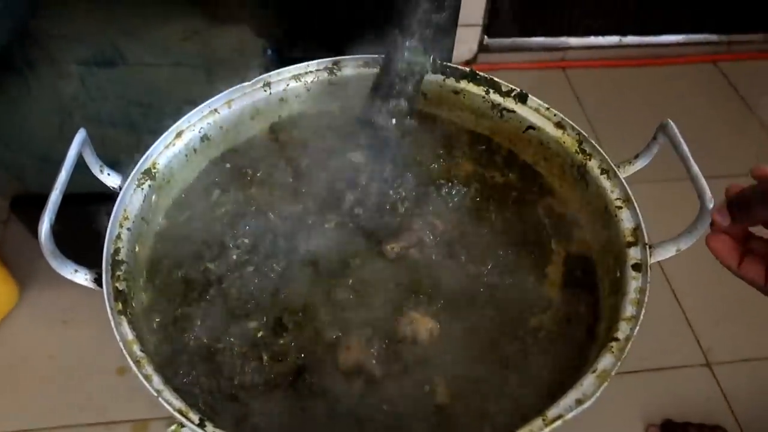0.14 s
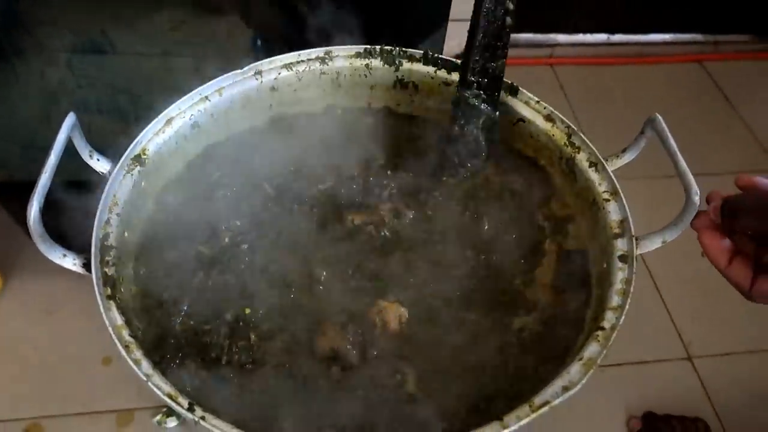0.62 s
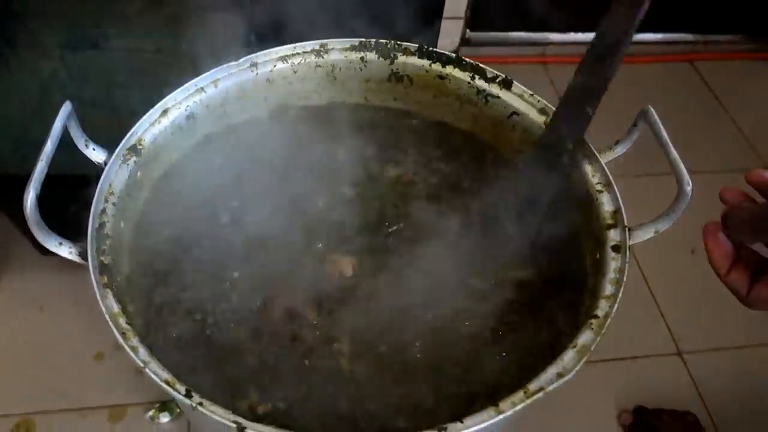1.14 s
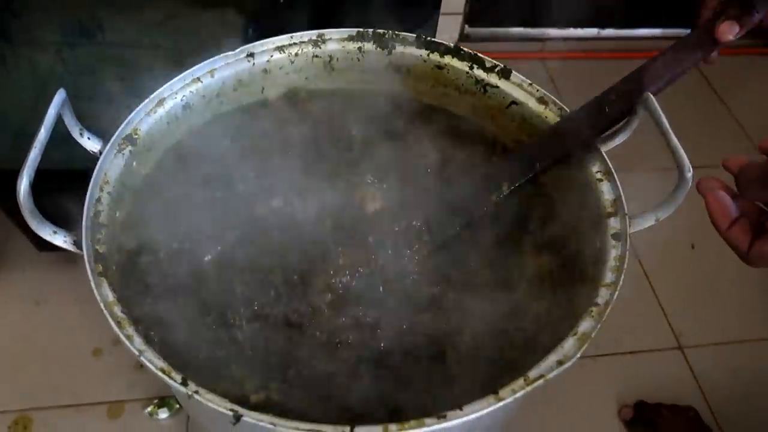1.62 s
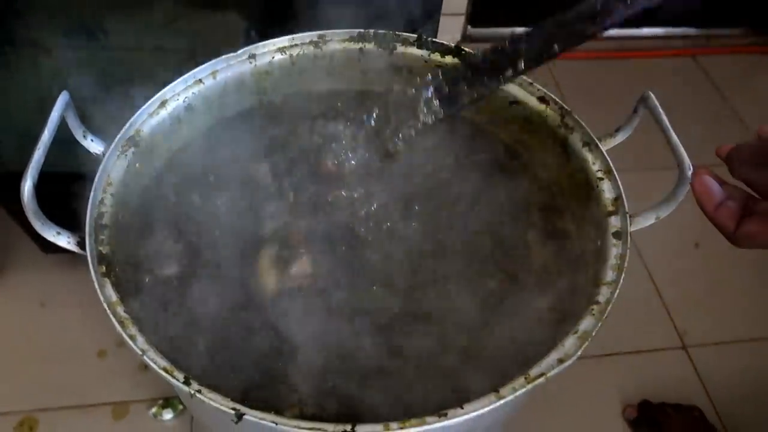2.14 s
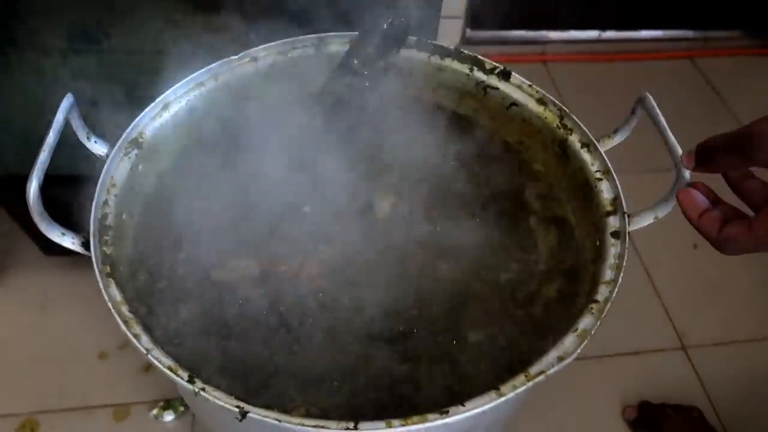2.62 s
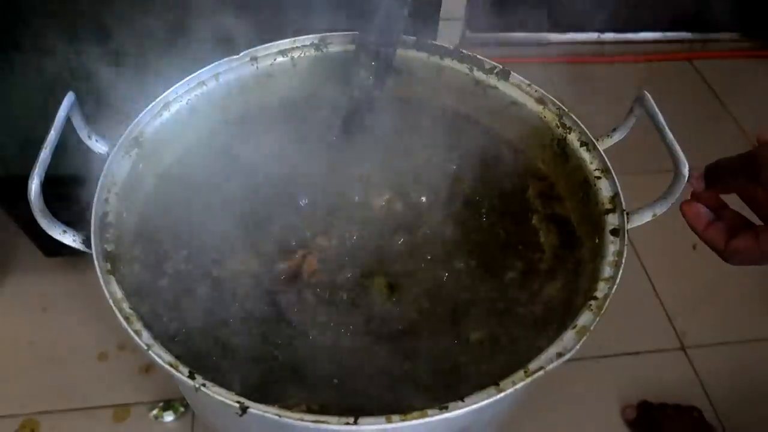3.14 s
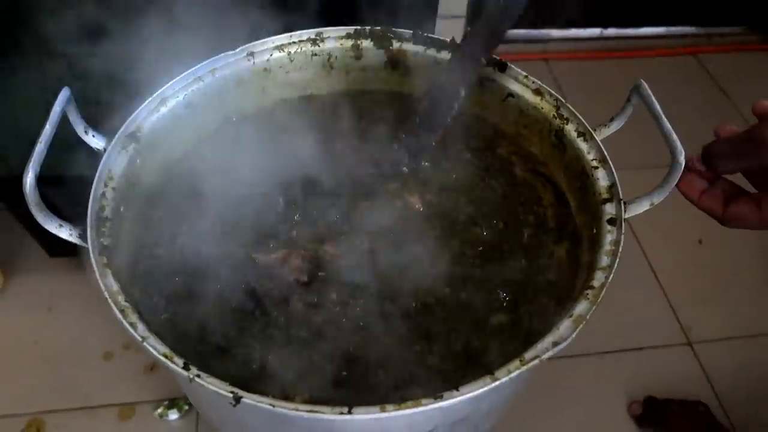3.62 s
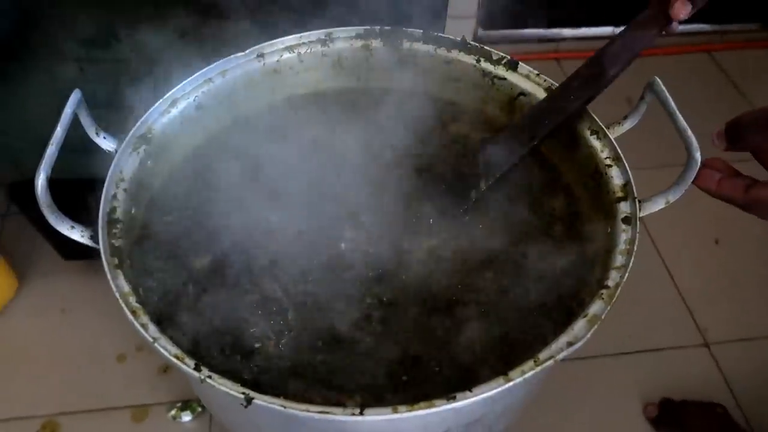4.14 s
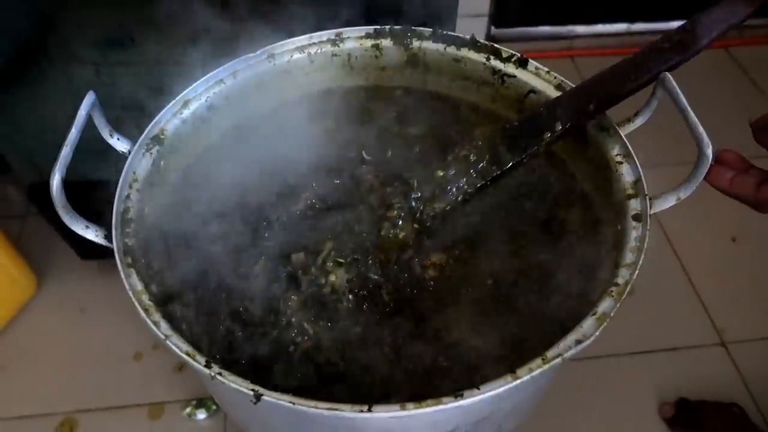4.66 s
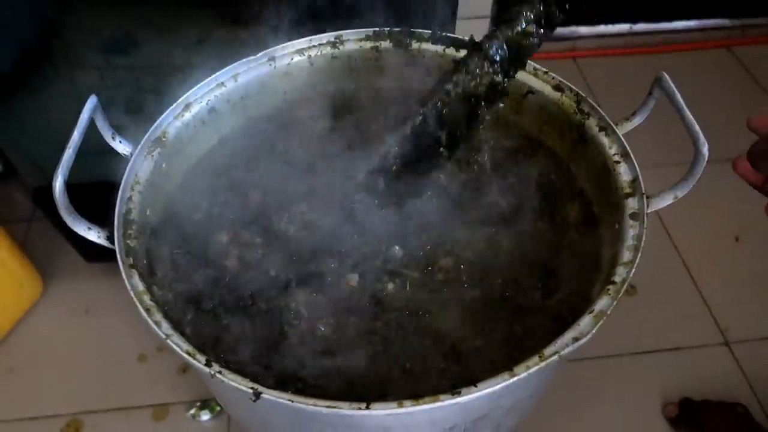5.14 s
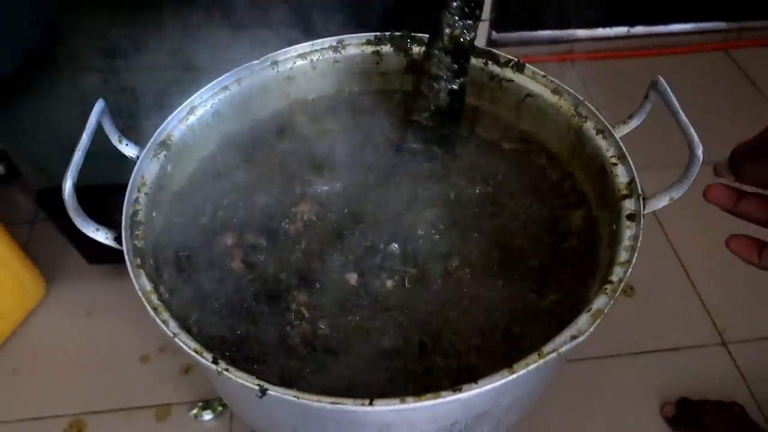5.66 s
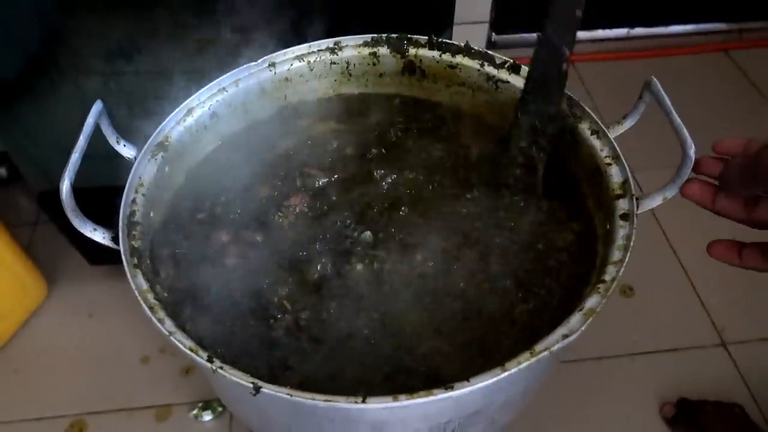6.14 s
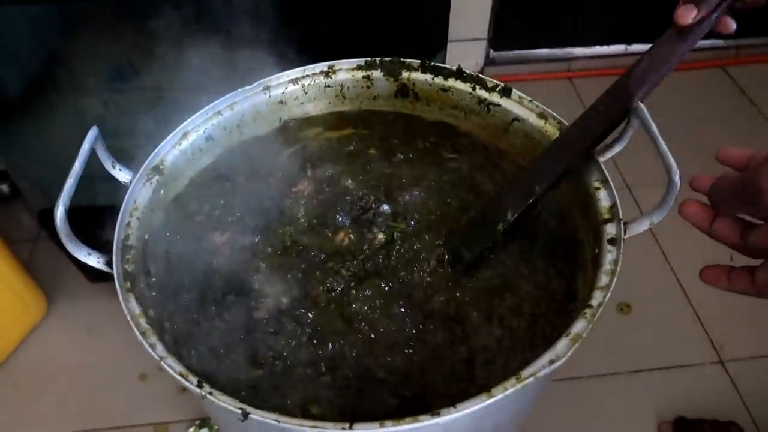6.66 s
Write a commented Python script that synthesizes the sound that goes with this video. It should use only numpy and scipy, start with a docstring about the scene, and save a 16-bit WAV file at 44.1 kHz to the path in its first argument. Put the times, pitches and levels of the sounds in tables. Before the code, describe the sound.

A big metal pot of thick soup keeps up a dense, soft simmer of countless small bubbles. Irregular wet pops and tiny high spits break out, clustering between three and four seconds, then sharply around five and six. Slow stirring makes the simmer swell and sink, with faint low paddle thuds. Close stereo microphone, short reflections from a tiled kitchen.

```python
"""Short pops and fine spits break out of a dense simmer: thick soup in a large metal pot.
Each pop is a steam cavity that rings for a few cycles, with close echoes and the tail of a hard room.
The simmer is many small bubbles and their reverberant wash, split into layers that swell as a paddle
stirs; narrow resonances of the pot wall colour it, and the paddle bumps the bottom with soft thuds."""
import sys
import numpy as np
from scipy import signal
from scipy.fft import rfft, irfft, next_fast_len
from scipy.io import wavfile
from scipy.ndimage import uniform_filter1d

SR = 44100
rng = np.random.default_rng(int(sys.argv[2]) if len(sys.argv) > 2 else 0)


def attenuation_scalar(level_db):
    """Turn a level in dB into a linear amplitude multiplier (20 dB per decade)."""
    decades = np.asarray(level_db, float) / 20
    return 10 ** decades


def materialize(psi):
    """Save the field psi as 16-bit PCM at rate SR to the path in sys.argv[1].

    A 1-D psi becomes a single channel; in a 2-D psi each row is a channel.
    """
    bounded = np.clip(np.atleast_2d(psi).T, -1, 1)
    quanta = np.round(bounded * 32767).astype(np.int16)
    wavfile.write(sys.argv[1], SR, quanta)


N = 298654  # length in samples

# Steam bubbles bursting, big bursts throw several sizes at once:
# start_s, level_db (peak before echoes), pitch_hz, length_cycles, tail_send_db (relative to the pop)
STEAM_POPS = [(0.1955, -40.5, 3100, 6, 12), (0.2394, -43, 1480, 1.8, 16), (0.291, -39.5, 1190, 2.7, 14.5),
              (0.2937, -21.5, 1556, 5.8, -2.5), (0.4544, -30, 1610, 3.1, 2.5),
              (0.6994, -18, 2340, 2.7, 2.5), (0.6993, -30, 3050, 4, 7), (0.8175, -30.5, 1620, 1.6, 7),
              (0.842, -30.5, 1470, 3.1, -5), (1.068, -23, 1083, 3.5, -2), (1.6955, -33.5, 1470, 2.8, 4),
              (1.8831, -33.5, 1790, 4.5, 4.5), (1.9225, -31, 1650, 4.1, 7), (2.031, -36, 710, 2.1, 3),
              (2.111, -42, 763, 4, 7), (2.142, -35, 1570, 2.6, -3), (2.2982, -24.5, 2790, 5.6, -10),
              (2.2997, -23, 2880, 5.1, 6.5), (2.3034, -31, 4700, 2.9, 7), (2.6828, -42, 2030, 7.1, 7),
              (2.8569, -23, 1800, 3.3, 4.3), (3.014, -29, 1270, 2.4, 7.5), (3.0325, -32, 3180, 5, -9),
              (3.066, -25, 1350, 1.7, 0.5), (3.336, -29, 1680, 2.9, 7), (3.3792, -28, 2030, 1.27, 16.5),
              (3.3855, -30, 1240, 11.6, 7), (3.401, -33, 1530, 6.1, 5), (3.455, -24.5, 623, 4.8, -1.5),
              (3.4735, -17, 990, 6.5, -5), (3.4755, -21.5, 3310, 8.2, -1), (3.472, -33.5, 5240, 6, 5),
              (3.6894, -31, 4100, 3.2, 9), (3.69, -39, 1120, 5.3, 7), (3.6905, -23.5, 3560, 6.4, 4.5),
              (3.6915, -17.5, 1540, 6.7, 3.5), (3.6945, -15.5, 2150, 2.3, 8), (3.7134, -22, 1540, 6, 3.5),
              (3.7164, -29, 2170, 4, 8), (3.7704, -36.5, 1970, 5.4, 11.5), (3.7753, -29, 4140, 4, -5),
              (3.845, -42, 1050, 7.1, -13), (3.8671, -18, 1650, 2, -0.5), (3.8676, -21, 3100, 13, -6.5),
              (3.895, -27, 3070, 13, -7), (4.0547, -58, 2180, 2.6, 30), (4.4408, -30, 1700, 2.3, 9.5),
              (4.5166, -40, 2950, 9, -26), (4.8259, -33, 2000, 4.3, 5), (4.89, -37, 710, 2.2, 9.5),
              (4.968, -42.5, 695, 3.2, 8), (4.969, -28.5, 1610, 1.4, 0), (5.039, -25.5, 1100, 1.8, 3),
              (5.04, -27.5, 786, 2.4, -6), (5.0391, -10.5, 1957, 5, 0), (5.0414, -22, 1490, 4.2, 0),
              (5.09, -31, 1590, 4.8, 9), (5.14, -21, 1100, 1.1, 3), (5.1554, -27.5, 2110, 3.7, 2),
              (5.2789, -28, 1840, 4.2, 3.5), (5.2839, -26.5, 3180, 9.2, -11),
              (5.7458, -24, 1580, 1.44, 7.5), (5.912, -29.5, 1300, 1.9, 8), (6.0551, -38.5, 2330, 3.3, 14),
              (6.124, -31.5, 920, 2.8, -1.5), (6.124, -36.5, 2040, 6.1, 6),
              (6.1245, -7.5, 5700, 2.53, -2.3), (6.125, -16.5, 4420, 11, -1.5),
              (6.287, -20.5, 830, 2.3, -3.5), (6.2886, -31, 1880, 3.7, -4), (6.308, -29, 1060, 2.3, 3),
              (6.329, -23.5, 2100, 4.1, -1), (6.4208, -31, 3670, 8.1, 1), (6.4203, -38, 4860, 8, 2),
              (6.431, -26.5, 1010, 1.7, -9), (6.4324, -31.5, 2090, 3.5, -3), (6.4338, -30, 1460, 2.2, 12),
              (6.4454, -38, 1420, 2.1, -2), (6.455, -29, 910, 2.1, -7), (6.52, -39, 570, 3.7, 8),
              (6.4986, -40, 1920, 4.9, 11), (6.7326, -29, 1480, 3.2, 3.5), (6.7416, -38, 3190, 8.4, 6)]
# Droplets spitting from the surface: start_s, level_db (peak before echoes), pitch_hz
DROPLET_SPITS = [(0.2944, -34, 7200), (0.379, -36.5, 13200), (0.3772, -30.5, 7200), (0.4967, -41, 8700),
                 (0.5147, -49, 11600), (1.0173, -41.5, 8000), (2.3044, -39, 6560), (2.352, -41, 11900),
                 (2.4284, -35, 11400), (2.7586, -42, 10300), (2.8695, -32.5, 7800), (2.8683, -37, 10700),
                 (2.9462, -37, 11600), (3.3375, -44, 7700), (3.6905, -38.5, 9300), (4.6588, -42, 11300),
                 (5.0404, -44, 8650), (5.1532, -41, 7170), (5.1542, -45, 11700), (5.2829, -37, 12400),
                 (5.2843, -33, 7200), (5.7588, -41, 8200), (5.7588, -44, 11900), (6.057, -32, 10600),
                 (6.124, -27, 10800), (6.126, -20, 6740), (6.4207, -39, 8600)]
# First echoes from soup surface and pot wall: delay_s, level_db
FIRST_ECHOES = [(.0008, -8.5), (.0022, -12), (.0034, -16.5), (.0055, -14)]
# Spectral slope inside each simmer layer: frequency_hz, density_db (per Hz, before layer levels)
SIMMER_COLOUR = [(15, -68), (25, -37), (82, -22), (161, 8.5), (301, -1), (545, 1), (1290, -8.5), (2000, -7),
                 (2550, -9), (3080, -7), (4370, -20.5), (5730, -23.5), (9840, -36), (11600, -42.5),
                 (16000, -53)]
# How unevenly the simmer churns: frequency_hz, spread_db
CHURN_SPREAD = [(300, 0.5), (1000, 2.03), (3000, 2.5), (6000, 2.44), (11000, 5)]
# The paddle turns the soup; only departures from each column's mean are used:
# time_s, simmer_db, rumble_db, treble_db
STIR_SWELLS = [(0.06, -47.5, -68, -54), (0.51, -50.5, -69.5, -48), (1.1, -49.5, -70, -52),
               (1.45, -47.5, -60.5, -51), (1.81, -54, -69.5, -50), (2.14, -47, -59.5, -50.5),
               (2.44, -49, -64, -46.5), (2.52, -48, -61, -49.5), (2.83, -51.5, -68.5, -50),
               (3.41, -45.5, -62.5, -48.5), (3.65, -49, -62.5, -49.5), (3.8, -46, -68.5, -46),
               (4.17, -50.5, -65, -52), (4.62, -52.5, -69, -50), (5.12, -47, -62.5, -46.5),
               (5.21, -53, -75, -45), (5.53, -48, -64.5, -50), (5.84, -53, -67.5, -45),
               (6.63, -45.5, -57.5, -49.5), (6.74, -46.5, -61, -53.5)]
# Layers of the simmer, thud to spray: low_hz, centre_hz, high_hz
SIMMER_LAYERS = [(30, 58, 90), (90, 180, 300), (300, 600, 1000), (1000, 1700, 2600), (2600, 3300, 4200),
                 (4200, 5300, 7000), (7000, 9500, 14000)]
# One row per layer, before the pot's ring: mean_level_db, then the shares it follows of each swell:
# simmer_share, rumble_share, treble_share (plain ratios)
LAYER_FOLLOW = [(-80, .1, .7, -.1), (-70.5, 0.085, 1.33, -0.24), (-54.5, 0.87, 0.045, 0.29),
                (-53, 1.9, -0.37, 0.23), (-56.5, 0.069, -0.11, 0.69), (-58.5, 0.16, -0.2, 0.88),
                (-73, 0.39, -0.12, 0.66)]
# The paddle bumps the bottom of the pot: start_s, level_db (peak), length_cycles
PADDLE_THUDS = [(1.4, -67, 4), (3.3, -58, 3), (3.44, -57.5, 4.6), (6.43, -65, 3)]
# Resonances of the pot wall: frequency_hz, width_hz, level_db (before the overall ring level)
POT_RINGS = [(58, 10, 0), (160, 30, -5), (260, 16, -6), (400, 40, -6), (473, 20, -8), (538, 14, -4),
             (738, 14, -2), (903, 30, -6), (1040, 40, -6), (1500, 30, -6), (1573, 22, -6), (1690, 22, -6),
             (1970, 50, -5), (2200, 50, -6), (3078, 40, -1), (3300, 80, -5), (3820, 160, -4),
             (5620, 250, -3), (6126, 20, -6)]
# Decay of the room tail: frequency_hz, t60_s
ROOM_DECAY = [(150, 0.8), (500, 0.53), (1500, 0.34), (4000, 0.33), (8000, 0.4), (14000, 0.46)]
# Gain of the side signal: frequency_hz, gain_db
SIDE_GAIN = [(60, -37), (110, -31), (200, -26), (380, -19), (700, -22.5), (1290, -15), (2380, -10.5),
             (4400, -5), (8120, 2), (15000, 12.5)]


def bubble(hz, cycles, glide=0.015):
    """A cavity of steam rings for a few cycles, swelling then dying, its pitch sliding up."""
    u = np.arange(int(4 * SR * cycles / hz) + 8) / SR * hz / cycles  # time in units of the length
    swell = (u / 0.6 * np.exp(1 - u / 0.6)) ** 4
    return swell * np.sin(2 * np.pi * cycles * u * (1 + glide * (u - 1)))


def steam_pops():
    """Bursting steam cavities, each as start, sound and tail send."""
    return [(s, attenuation_scalar(db) * bubble(hz, max(cycles, 1)), tail_db)
            for s, db, hz, cycles, tail_db in STEAM_POPS]


def droplet_spits(cycles=3.7, tail_db=-4):
    """Spitting droplets, each a short high ring, as start, sound and tail send."""
    return [(s, attenuation_scalar(db) * bubble(hz, cycles), tail_db) for s, db, hz in DROPLET_SPITS]


def bursts(count=4):
    """Pops and spits reflect off soup, wall and room; several tails take turns. Returns mid and side."""
    direct, sends = np.zeros(N), np.zeros((count, N))
    for k, (s, sound, tail_db) in enumerate(steam_pops() + droplet_spits()):
        add(direct, s, sound)
        add(sends[k % count], s, attenuation_scalar(tail_db) * sound)
    early = np.zeros(SR // 20)
    early[0] = 1  # the direct sound
    for s, db in FIRST_ECHOES:
        early[round(s * SR)] = attenuation_scalar(db)
    heard = signal.fftconvolve(direct, early)[:N]
    # mid and side each get their own independent tails
    mid_tail, side_tail = (
        sum(signal.fftconvolve(send, tail())[:N] for send in sends) for _ in "ms")
    # two close ports differ in arrival time, not level: the side runs a quarter turn from the mid
    across = signal.hilbert(heard, next_fast_len(N)).imag[:N]
    return heard + mid_tail, attenuation_scalar(-1.0) * side_tail + attenuation_scalar(-8.5) * across


def small_bubbles(per_s=260, spread_db=0.5, count=30):
    """Little steam cavities of many pitches ring at random moments, at nearly equal strength."""
    strikes = rng.random(N) < per_s / SR
    strength = attenuation_scalar(spread_db * np.minimum(rng.exponential(1, N), 4)) * strikes
    kind, out = rng.integers(0, count, N), np.zeros(N)
    for k, hz in enumerate(np.geomspace(450, 9000, count)):
        out += signal.oaconvolve(strength * (kind == k), bubble(hz, 3.32))[:N]
    return evened(out)


def churning(t, hz):
    """Soup boils unevenly: smooth random patches over time and frequency, in dB."""
    patches = rng.standard_normal((len(t), len(hz)))
    patches = uniform_filter1d(patches, size=10, axis=0)
    patches = evened(uniform_filter1d(patches, size=14, axis=1)).T
    return read(CHURN_SPREAD, hz)[:, None] * patches


def stirring(t, hz, colour):
    """Turning soup swells each layer by its shares; gives the layer lift in dB, blended over frequency."""
    s, *levels = np.transpose(STIR_SWELLS)
    swells = np.array([np.interp(t, s, db - db.mean()) for db in levels])
    lifts = []
    for (low, _, high), (mean_db, *shares) in zip(SIMMER_LAYERS, LAYER_FOLLOW):
        # the layer's share of the colour is brought to its own level
        own_db = 10 * np.log10((colour[(hz >= low) & (hz < high)] ** 2).sum())
        lifts.append(mean_db + np.array(shares) @ swells - own_db)
    centres = [centre for _, centre, _ in SIMMER_LAYERS]
    blend = np.array([read(list(zip(centres, row)), hz) for row in np.eye(len(SIMMER_LAYERS))])
    return blend.T @ np.array(lifts)


def simmer(near_db=-7, ring_db=9):
    """Near bubbles, their tail and a noise wash of far ones, coloured by the pot and moved by the stirring."""
    near = small_bubbles()
    mid, side = (
        evened(signal.fftconvolve(near, tail())[:N]) + 0.94 * rng.standard_normal(N) for _ in "ms")
    mid = mid + attenuation_scalar(near_db) * near
    hz, t, z = signal.stft([mid, side], SR, nperseg=1024, noverlap=768)
    white = z / np.sqrt((abs(z) ** 2).mean(axis=2, keepdims=True))  # every frequency at equal power
    colour = attenuation_scalar(read(SIMMER_COLOUR, hz))
    moved_db = stirring(t, hz, colour) + churning(t, hz)
    z = white * colour[:, None] * attenuation_scalar(moved_db)
    both = signal.istft(z, SR, nperseg=1024, noverlap=768)[1][:, :N]
    return np.array([shaped(x, lambda f: pot(f, ring_db)) for x in both])


def paddle_thuds(mix, hz=59):
    """The paddle bumps the bottom of the pot: soft deep rings of a few cycles, added to the mix."""
    for s, db, cycles in PADDLE_THUDS:
        add(mix, s, attenuation_scalar(db) * bubble(hz, cycles))


def pot(hz, ring_db):
    """The metal wall resonates: gain with narrow peaks over a flat body."""
    rings = sum(attenuation_scalar(2 * db) / (1 + (2 * (hz - f) / width) ** 2) for f, width, db in POT_RINGS)
    return np.sqrt(1 + attenuation_scalar(2 * ring_db) * rings)


def tail():
    """Dense reflections of energy 1, each band dying at its own speed, tinted by the pot."""
    hz, t, z = signal.stft(rng.standard_normal(SR), SR, nperseg=256)
    decay = attenuation_scalar(-60 * t / read(ROOM_DECAY, hz)[:, None])
    h = signal.istft(z * decay, SR, nperseg=256)[1][:SR]
    onset = np.clip((np.arange(SR) / SR - 0.003) / 0.0005, 0, 1)  # silent 3 ms, then a 0.5 ms rise
    h = shaped(h, lambda f: pot(f, 4.6)) * onset
    return h / np.linalg.norm(h)


def read(points, hz):
    """Reads a curve on a log-frequency axis."""
    f, value = np.transpose(points)
    return np.interp(np.log(hz + 1), np.log(f + 1), value)


def evened(x):
    """Scales to rms 1."""
    return x / np.sqrt(np.mean(x ** 2) + 1e-20)


def shaped(x, gain):
    """Multiplies the whole spectrum by gain(hz)."""
    size = next_fast_len(len(x))
    return irfft(rfft(x, size) * gain(np.fft.rfftfreq(size, 1 / SR)), size)[:len(x)]


def add(mix, s, sound):
    """Mixes a sound in at time s, in seconds."""
    part = mix[round(s * SR):][:len(sound)]
    part += sound[:len(part)]


def scene():
    """Mid and side of the pot become left and right; the side grows towards the treble."""
    # the pops and spits carry little sound below about 250 Hz
    thin = [shaped(x, lambda hz: hz ** 2 / (hz ** 2 + 250 ** 2)) for x in bursts()]
    mid, side = np.array(thin) + simmer()
    paddle_thuds(mid)
    side = shaped(side, lambda hz: attenuation_scalar(read(SIDE_GAIN, hz)))
    return np.array([mid + side, mid - side])


def top_cut(x):
    """Nothing passes above the cut-off."""
    return signal.sosfilt(signal.butter(12, 16320, fs=SR, output="sos"), x)


def record(dry):
    """Gain control leans on loud pops and lets go gradually, which flattens their tails."""
    power = uniform_filter1d((dry ** 2).mean(axis=0), size=440, origin=219)  # over the last 10 ms
    power_db = 10 * np.log10(abs(power) + 1e-12)
    fall_db = np.arange(N) * 28.0 / SR  # the held level falls 28 dB a second
    held_db = np.maximum.accumulate(power_db + fall_db) - fall_db
    over_db = np.maximum(held_db + 25.5, 0)  # excess over a threshold of -25.5 dB
    ducked = dry * attenuation_scalar(-0.3 * uniform_filter1d(over_db, size=130, origin=64))  # eased over 3 ms
    return top_cut(ducked)


dry = scene()
out = record(dry)
materialize(out)
```